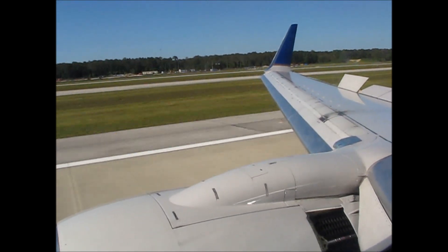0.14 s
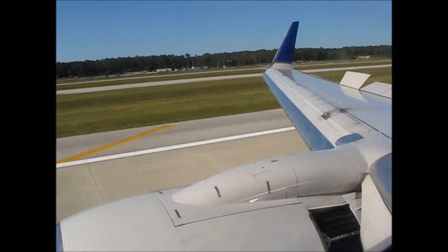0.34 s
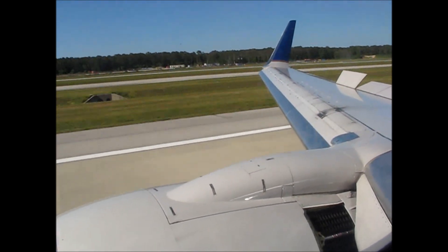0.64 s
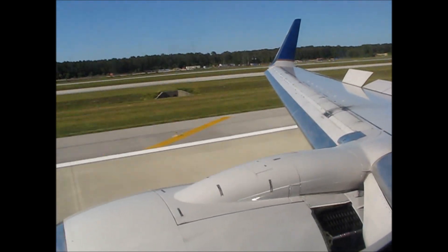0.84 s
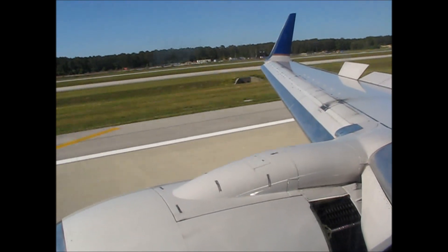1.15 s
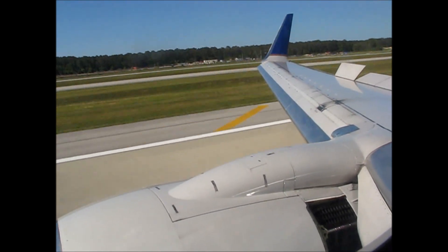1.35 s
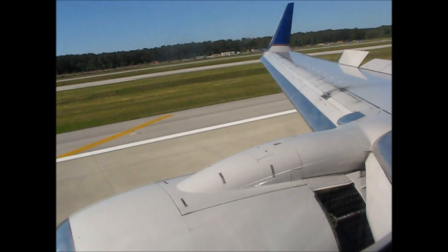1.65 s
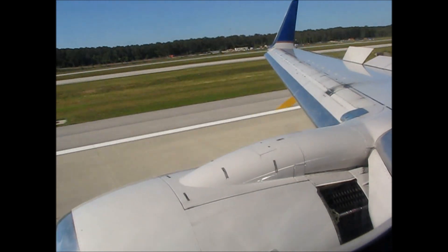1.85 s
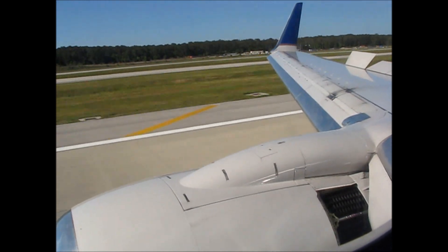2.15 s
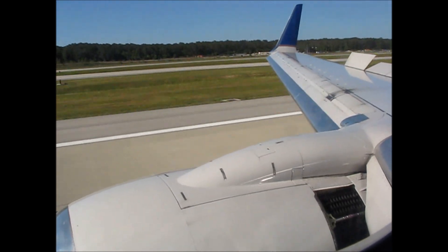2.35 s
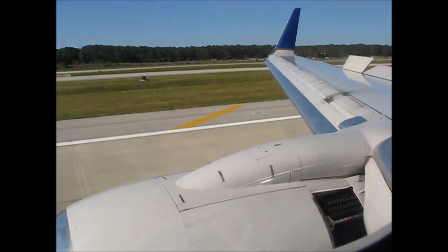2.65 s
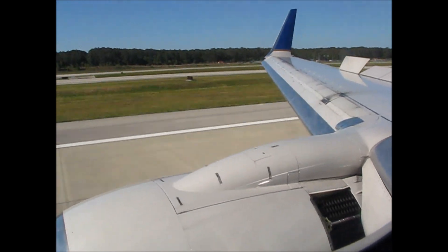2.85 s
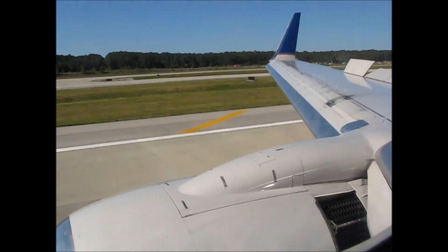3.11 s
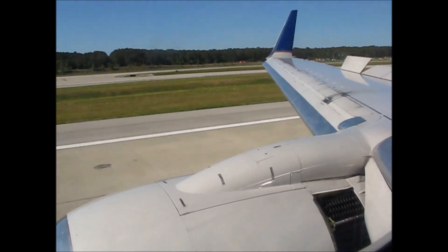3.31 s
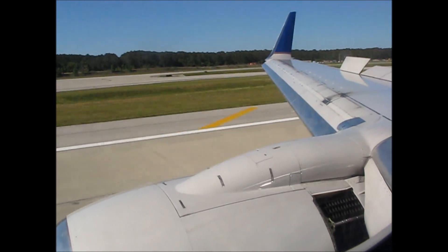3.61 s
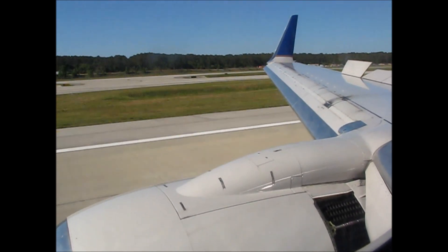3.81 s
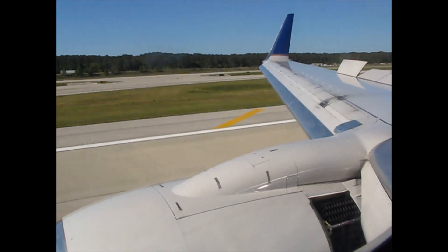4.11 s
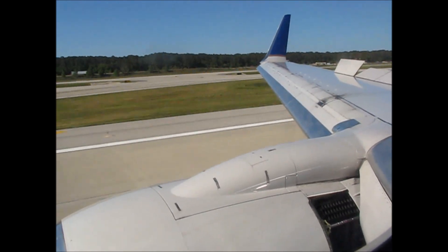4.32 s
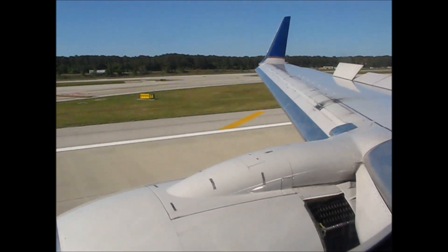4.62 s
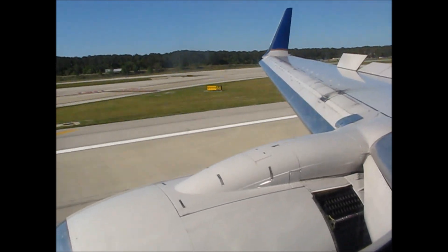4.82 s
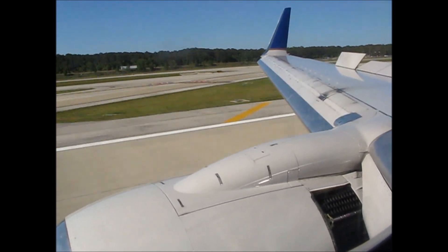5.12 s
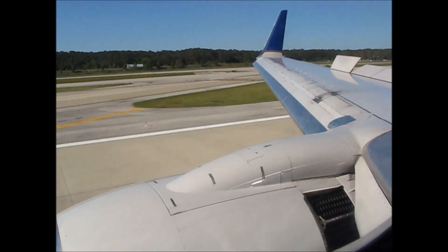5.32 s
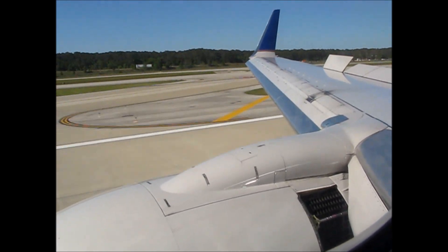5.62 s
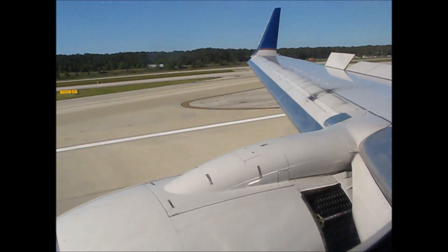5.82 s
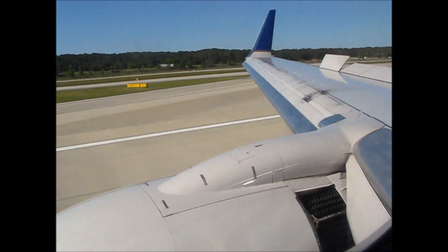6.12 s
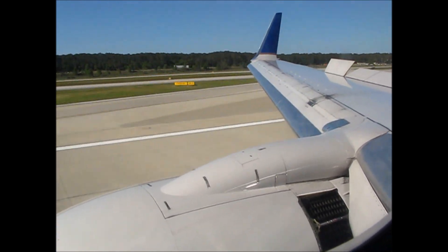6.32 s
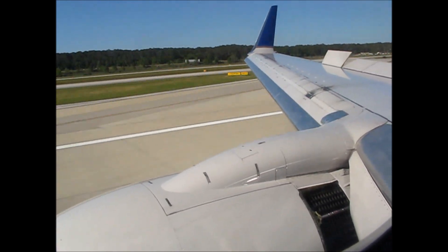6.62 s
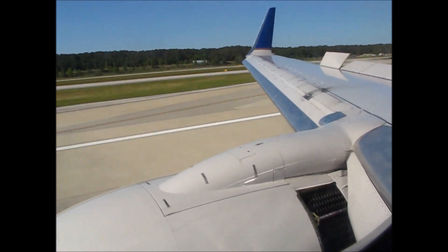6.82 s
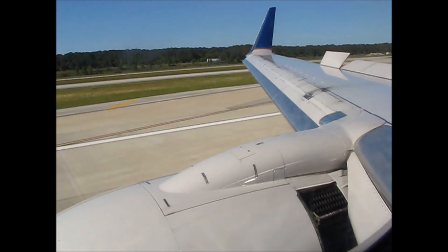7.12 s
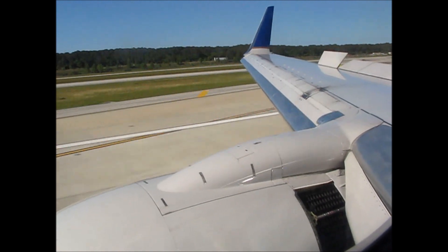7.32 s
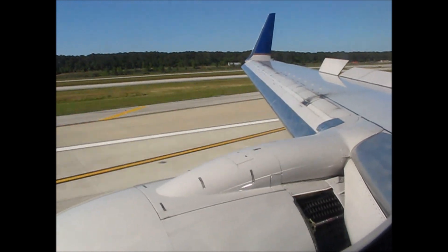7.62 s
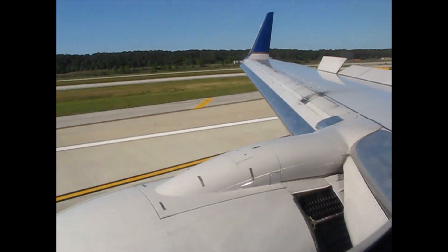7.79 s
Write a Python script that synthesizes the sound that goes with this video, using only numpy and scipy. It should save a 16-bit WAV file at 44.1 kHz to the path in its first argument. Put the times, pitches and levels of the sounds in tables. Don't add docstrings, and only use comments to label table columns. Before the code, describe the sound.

Cabin interior of a twin jet just after touchdown, captured by a small camera with two close microphones: bass nearly central, treble wider. At 0 s deep wheel rumble and hull boom dominate, with residual engine roar easing until 0.7 s, over vent hiss and buzzing trim. Irregular runway-joint thumps recur throughout, such as 0.5, 1.1, 1.8, 2.7, 4.5 and 6.6 s. Short high pings and dry plastic ticks cluster until about 2.8 s, then become sparse. Reverse thrust rises from 1 s, jumps near 2.4 s and reaches a dense, turbulent roar by 3.6 s. Gusts slap and flutter against the wall from 2.5 s, with a lull around 5-6 s, then more until the end. A narrow airy whistle slowly strengthens beside a faint wavering fan tone near 2.7 kHz. Bass peaks clip roughly, their ceiling lowering over the first 3.3 s; the roar continues to 8 s.

```python
import sys
import numpy as np
from scipy import signal
from scipy.fft import rfft, irfft, next_fast_len
from scipy.io import wavfile
from scipy.ndimage import uniform_filter1d

SR = 44100
rng = np.random.default_rng(int(sys.argv[2]) if len(sys.argv) > 2 else 0)


def invert_db(x):
    u = np.asarray(x, float) / 20
    return 10 ** u


def unload_audio(sound):
    columns = np.transpose(np.atleast_2d(sound))
    steps = np.round(np.clip(columns, -1, 1) * 32767)
    wavfile.write(sys.argv[1], SR, steps.astype(np.int16))


N = 350595
T = np.arange(N) / SR
SIZE = next_fast_len(N + 4096)
HZ = np.maximum(np.fft.rfftfreq(SIZE, 1 / SR), 1)


def on_log(points):
    hz, value = np.transpose(points)
    return np.interp(np.log(HZ), np.log(np.maximum(hz, 1)), value)


def colour(x, db):
    return irfft(rfft(x, SIZE) * invert_db(db), SIZE)[..., :N]


def rings(modes):
    return sum(db / (1 + (2 * (HZ - hz) / width) ** 2) for hz, width, db in modes)


def walk(rate):
    held = np.repeat(rng.standard_normal(int(T[-1] * rate) + 2), 8)
    slewed = 1.3 * uniform_filter1d(uniform_filter1d(held, size=8), size=8)
    return np.interp(T * rate * 8, np.arange(len(held)), slewed)


def turbulence(points, modes, level_db, swell_db, flicker_db, rate):
    low, top = points[0][0], points[-1][0]
    octaves_outside = np.maximum(np.log2(low / HZ), 0) + np.maximum(np.log2(HZ / top), 0)
    shape_db = on_log(points) + rings(modes) - 40 * octaves_outside
    spectrum = rfft(rng.standard_normal((2, N)), SIZE) * invert_db(shape_db)
    high = np.clip(np.log(HZ / low) / np.log(top / low), 0, 1)
    out = 0
    for share in (1 - high, high):
        side = irfft(spectrum * share, SIZE)[:, :N]
        out = out + invert_db(flicker_db * walk(rate)) * side
    return out * invert_db(level_db + swell_db * walk(rate)) / np.std(out)


def bursts(times, sizes, t60):
    starts = np.zeros(N)
    np.add.at(starts, np.minimum((times * SR).astype(int), N - 1), sizes)
    envelope = signal.lfilter([1], [1, -np.exp(-np.log(1000) / (t60 * SR))], starts)
    return envelope * rng.standard_normal((2, N))


def follow(thrust, idle_db, rise_db, shake_db, fade_s):
    return idle_db + rise_db * thrust + shake_db * np.exp(-T / max(fade_s, .01))


# (time [s], share of full thrust [0-1])
THRUST = [(0, 0.3), (.7, 0), (1.0, .05), (1.4, 0.28), (1.9, .4), (2.2, 0.4), (2.45, 0.69), (2.8, 0.77),
          (3.6, 0.93), (4.9, 0.97), (7.95, 0.92)]


def spool_up():
    s, share = np.transpose(THRUST)
    return np.interp(T, s, share)


# (frequency [Hz], density [dB per Hz])
VENT = [(3500, -10), (5500, 2.5), (7000, -4.5), (8500, -5), (9450, -7), (9750, -7.5), (12500, -9),
        (14000, -14), (16000, -12.5)]
# (frequency [Hz], width [Hz], gain [dB])
VENT_RINGS = [(7140, 500, 2.5), (9060, 550, 5.5), (9800, 400, -5), (11400, 850, 5)]


def vent_hiss(thrust):
    level_db = follow(thrust, idle_db=-63.5, rise_db=4, shake_db=8.5, fade_s=0.26)
    return turbulence(VENT, VENT_RINGS, level_db, swell_db=.3, flicker_db=.6, rate=21)


def fan_whine(thrust):
    blade_hz = 2755 * (1 + .007 * walk(40))
    phase = 2 * np.pi * np.cumsum(blade_hz) / SR
    level_db = follow(thrust, idle_db=-70.5, rise_db=8.5, shake_db=.5, fade_s=2.5)
    return np.sqrt(2) * invert_db(level_db + 2.5 * walk(12)) * np.array([np.sin(phase), np.cos(phase)])


# (frequency [Hz], density [dB per Hz])
WHOOSH = [(3300, -22), (3700, -3), (4100, -5.5), (4300, 1.5), (4550, -3), (4700, -21)]


def vane_whoosh(thrust):
    level_db = follow(thrust, idle_db=-71.5, rise_db=11, shake_db=1.5, fade_s=1.4)
    slowing_db = 1.26 * T
    return turbulence(WHOOSH, [], level_db + slowing_db, swell_db=.7, flicker_db=.3, rate=15)


# (frequency [Hz], density [dB per Hz])
TRIM = [(1800, -10), (2300, -5), (2800, -3), (3700, -3.5), (4550, -10.5), (4750, -11.5), (5600, -16),
        (7000, -22), (10000, -29.5), (16000, -39)]
# (frequency [Hz], width [Hz], gain [dB])
TRIM_RINGS = [(2804, 40, 7.5), (3170, 130, 2.5), (3800, 570, 5), (2700, 54, 2), (4700, 90, -1),
              (4300, 180, 1.5), (5050, 250, 4.5)]


def trim_buzz(buzz_db):
    return turbulence(TRIM, TRIM_RINGS, buzz_db, swell_db=.4, flicker_db=0.43, rate=21)


def trim_chatter(buzz_db):
    when, chance = rng.random((3000, 2)).T
    sizes = invert_db(np.minimum(-3.5 * np.log(chance), 13))
    contact_db = on_log([(1500, -35.5), (2500, -5.5), (12000, 3.0)])
    impacts = bursts(when * T[-1], sizes, t60=.012)
    clicks = colour(impacts, on_log(TRIM) + rings(TRIM_RINGS) + contact_db)
    return clicks / np.std(clicks) * invert_db(buzz_db - 10)


# (time [s], peak level [dB], hardness [dB], more edge and less thud)
TICKS = [(.42, -50, -7.5), (.446, -53.5, -5.5), (.64, -52.5, 4.5), (.677, -58.5, -3.5), (1.067, -49.5, -1),
         (1.104, -45, 2.5), (1.427, -49.5, -0.5), (1.46, -52, -1.5), (1.588, -53, -3), (1.729, -48, 6),
         (1.91, -53, 2.5), (2.026, -48, 1), (2.062, -41.5, -6), (2.137, -52, 5), (2.312, -52, 1),
         (2.449, -47, 9), (2.495, -49.5, 1.5), (2.649, -45, 3.5), (2.704, -43.5, -2), (2.725, -49, 3.5),
         (2.758, -44.5, 6), (2.801, -48, -4), (2.976, -48.5, -3.5), (3.394, -49.5, -1.5),
         (3.472, -43, 10.5), (3.563, -48, 2.7), (4.433, -50.5, -2), (5.121, -49.5, -1.5)]
# (frequency [Hz], gain [dB])
TICK_BODY = [
    [(2000, -26), (3000, -5.5), (4700, 4.5), (5800, -11.5), (7000, -33)],
    [(4500, -25), (6000, -1.5), (8000, -2), (9200, 0), (10000, -9), (12000, -33.5)],
    [(8000, -33.5), (10000, -1), (12000, 3.5), (15500, -8.5), (17000, -9)],
]


def ticks():
    s, peak_db, hard_db = np.transpose(TICKS)
    thud_db = peak_db + 10.0 - hard_db
    ring_db = peak_db + 6.5
    edge_db = peak_db - 7 + hard_db
    out = 0
    for db, body in zip((thud_db, ring_db, edge_db), TICK_BODY):
        tap = bursts(s, invert_db(db), t60=0.03)
        tail = invert_db(-13.5) * bursts(s, invert_db(db), t60=0.07)
        out = out + colour(tap + tail, on_log(body))
    return out


# (time [s], peak level [dB], frequency [Hz])
PINGS = [(0.1346, -33.5, 3630), (0.1947, -41, 3950), (0.8102, -31.5, 3850), (0.8731, -43, 3930),
         (0.946, -42, 3800), (1.1044, -40, 3180), (1.1923, -37, 3770), (1.2368, -38, 3820),
         (1.372, -36, 3560), (1.515, -35, 3840), (1.698, -33.5, 3750), (1.8494, -35.5, 3800),
         (1.994, -38, 3550), (2.0697, -42, 3760), (2.406, -38.5, 3630)]


def pings():
    t = np.arange(1500) / SR
    decay = np.exp(-np.log(1000) * t / .016)
    out = np.zeros(N + len(t))
    for s, db, hz in PINGS:
        start = int(s * SR)
        out[start:start + len(t)] += invert_db(db + 2.0) * decay * np.sin(2 * np.pi * hz * t)
    return out[:N]


# (time [s], wheel thump [dB], hull boom [dB])
JOINTS = [(.06, 0.5, -2), (.46, 5.5, 1), (1.08, 5, -3), (1.799, 4, -3), (2.48, -1.5, 6.5), (2.7, 6.5, 1.5),
          (3.12, -4, 4), (3.39, 2.5, 1.5), (4.221, -0.5, 6.5), (4.489, 6, -4), (5.05, -4, 0),
          (5.28, 0.5, 5), (5.46, 2, 0), (6.5, -2.5, 3.5), (6.62, 6, -1), (6.8, -5, 3.5), (7.05, 1, -2.5),
          (7.42, -4, 5), (7.9, -4.5, 4.5)]


def joints_db():
    s, thump_db, boom_db = np.transpose(JOINTS)
    slow = T[::64]
    humps = np.exp(-((slow[:, None] - s) / .05) ** 2 / 2)
    return np.interp(T, slow, humps @ thump_db), np.interp(T, slow, humps @ boom_db)


# (frequency [Hz], density [dB per Hz])
RUMBLE = [(15, -22), (30, -2.5), (49, -4.5), (65, -4.5), (80, -15), (100, -30.5)]
# (frequency [Hz], width [Hz], gain [dB])
CABIN = [(48.8, 30, 11), (88.3, 73, 3.5), (170.4, 11, 4.5), (203.3, 20, 3), (284, 31, 6), (316, 20, 4)]


def wheel_rumble(thrust, thump_db):
    level_db = follow(thrust, idle_db=-22, rise_db=1.5, shake_db=6.5, fade_s=.5)
    return turbulence(RUMBLE, CABIN, level_db + thump_db, swell_db=0.32, flicker_db=.3, rate=21)


# (frequency [Hz], density [dB per Hz])
BOOM = [(50, -24.5), (70, -7.5), (90, -2), (125, -6), (145, -7.5), (180, -31.5)]


def hull_boom(thrust, boom_db):
    level_db = follow(thrust, idle_db=-20, rise_db=4.5, shake_db=2, fade_s=1.7)
    return turbulence(BOOM, CABIN, level_db + boom_db, swell_db=0.49, flicker_db=0.35, rate=32.0)


# (frequency [Hz], density [dB per Hz])
SKIN = [(400, 0), (500, -2), (600, -10.5), (680, -7), (780, -6), (890, -14), (1270, -14), (1800, -20.5),
        (2600, -38)]
# (frequency [Hz], width [Hz], gain [dB])
PANELS = [(745, 120, 7), (996, 150, 7.5), (1598, 40, 4.5), (2006, 33, 7), (2140, 77, 10.5),
          (2430, 36, -1.5)]


def skin_drumming(thrust):
    level_db = follow(thrust, idle_db=-38, rise_db=10.5, shake_db=0, fade_s=0.7)
    return turbulence(SKIN, PANELS, level_db, swell_db=0.57, flicker_db=0.85, rate=16)


# (time [s], swell of the roar [dB])
BUFFETS = [(2.47, 6), (2.672, 4.5), (2.72, 6), (2.892, 3.5), (3.255, 6), (3.488, 4.5), (3.525, 4.5),
           (3.561, 9.5), (3.934, 7), (4.106, -3.5), (4.267, 1.7), (4.322, 3), (4.447, 8.5), (4.612, 2.5),
           (4.864, 4), (4.89, 4.5), (6.154, 6), (6.372, 7), (6.53, 5), (6.576, 5), (6.652, 6), (7.138, 3.5),
           (7.173, 9.5), (7.345, 4), (7.397, 2.5), (7.54, 4), (7.682, 8.5)]


def slaps():
    t = np.arange(-600, 600) / SR
    flex = np.exp(-(t / 0.0033) ** 2 / 2) * np.sin(2 * np.pi * 229.7 * t)
    s, db = np.transpose(BUFFETS)
    starts = np.zeros(N)
    starts[((s + .002) * SR).astype(int)] = invert_db(db - 10)
    return signal.fftconvolve(starts, flex, mode="same")


def buffet_db():
    s, db = np.transpose(BUFFETS)
    starts = np.zeros(N)
    starts[((s - .004) * SR).astype(int)] = db
    sinking = signal.lfilter([1], [1, -np.exp(-1 / (0.015 * SR))], starts)
    return uniform_filter1d(sinking, size=130)


# (frequency [Hz], density [dB per Hz])
ROAR = [(100, -28.5), (130, -6), (160, -2), (200, -3.5), (260, -7), (330, -8), (370, -14.5), (480, -21),
        (580, -39.5)]


def reverse_roar(thrust, gust_db):
    level_db = follow(thrust, idle_db=-20.5, rise_db=10.5, shake_db=-1, fade_s=0.6)
    return turbulence(ROAR, CABIN, level_db + 0.4 * gust_db, swell_db=.4, flicker_db=0.37, rate=13)


# (frequency [Hz], level [dB])
UNLIKE = [(60, -34), (160, -31), (260, -37.5), (420, -25), (690, -22.5), (1120, -17.5), (1830, -4.5),
          (2980, -9.5), (4860, 0), (8000, 1.7), (14000, -1.5)]
# (frequency [Hz], level difference [dB])
LEAN = [(60, 0.95), (260, 0.57), (420, -0.6), (690, 3.5), (1120, 0.5), (1830, -2), (2980, -4), (4860, -7.5),
        (7000, 4), (12000, -0.6)]


def ports(parts):
    shared, unlike = rfft(parts, SIZE)
    unlike = unlike * invert_db(on_log(UNLIKE))
    lag = np.exp(-1j * np.pi * HZ * 1.22 / SR)
    lean = invert_db(on_log(LEAN) / 2) * lag
    return irfft([(shared + unlike) * lean, (shared - unlike) / lean], SIZE)[:, :N]


def scene():
    thrust = spool_up()
    thump_db, boom_db = joints_db()
    gust_db = buffet_db()
    buzz_db = follow(thrust, idle_db=-51.5, rise_db=9, shake_db=4.5, fade_s=0)
    parts = vent_hiss(thrust) + fan_whine(thrust) + vane_whoosh(thrust)
    parts += trim_buzz(buzz_db)
    parts += trim_chatter(buzz_db + 0.7 * gust_db)
    parts += ticks() + pings()
    parts += wheel_rumble(thrust, thump_db) + hull_boom(thrust, boom_db)
    parts += skin_drumming(thrust) + slaps()
    parts += reverse_roar(thrust, gust_db)
    return ports(parts)


def roll_off(x):
    return signal.sosfilt(signal.butter(12, 15740, fs=SR, output="sos"), x)


def record(dry):
    turn = np.minimum(T / 3.3, 1)
    eased = turn ** 2 * (3 - 2 * turn)
    ceiling = invert_db(-.8 - 5.4 * eased)
    faded_in = dry * np.minimum(T / 0.0037, 1)
    clipped = np.clip(faded_in, -ceiling, ceiling)
    capacitor_pole = np.exp(-2 * np.pi * 19 / SR)
    mix = signal.lfilter([1, -1], [1, -capacitor_pole], clipped)
    return roll_off(mix)


dry = scene()
out = record(dry)
unload_audio(out)
```